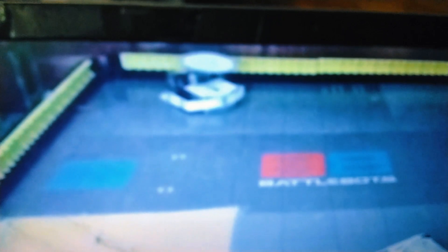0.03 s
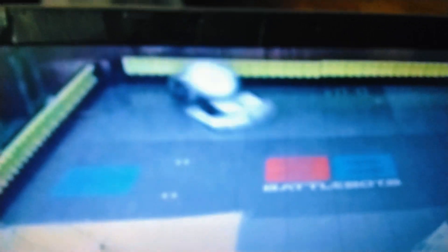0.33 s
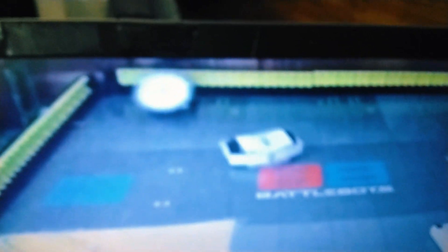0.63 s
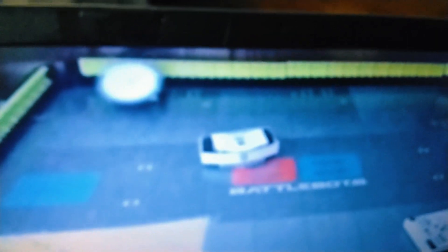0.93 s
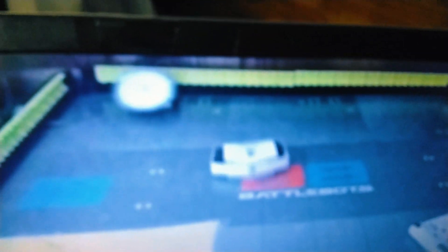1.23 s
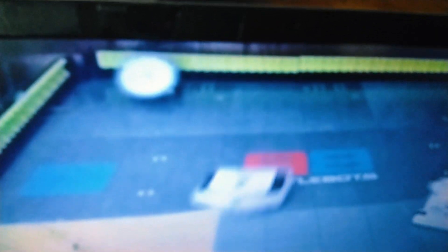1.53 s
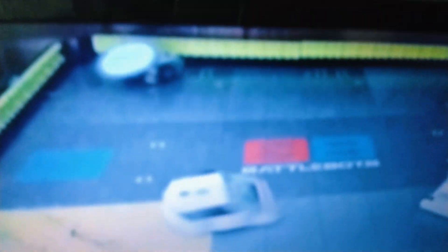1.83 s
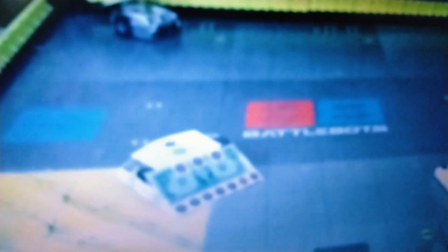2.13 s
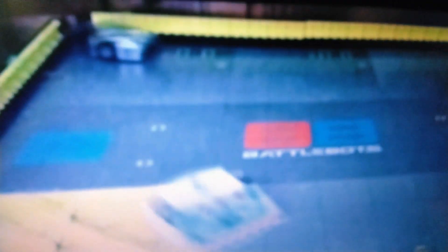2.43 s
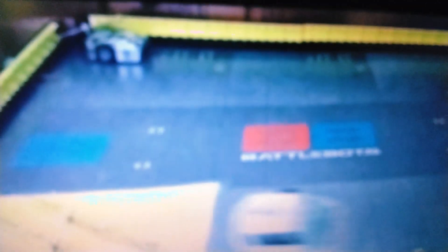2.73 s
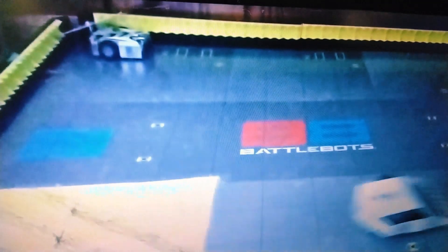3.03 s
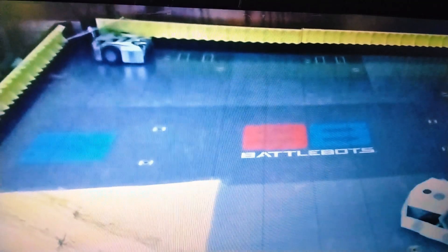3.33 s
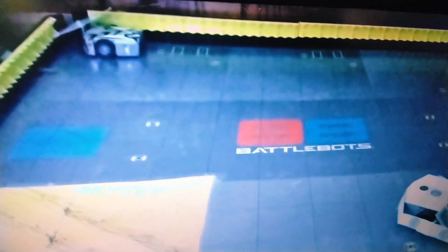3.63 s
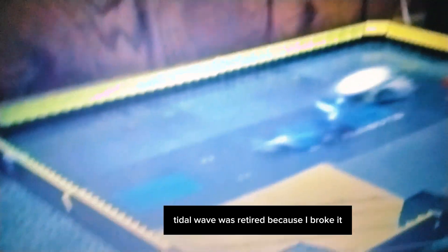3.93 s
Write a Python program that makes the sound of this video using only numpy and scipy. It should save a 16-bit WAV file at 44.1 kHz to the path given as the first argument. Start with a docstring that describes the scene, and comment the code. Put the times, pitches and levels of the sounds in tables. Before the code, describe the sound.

Toy robots drive in short spurts with rattling plastic gears and a few knocks.

```python
"""Toy robots in a tabletop arena

Two toy robots drive in bursts round a plastic arena: gear teeth chatter through their shells and
wheels roll on the board. Gears snap as a motor starts or stops and whine once, a tyre scrapes, and
the robots knock into things. All this is on the left, with a few dull bumps on the hand-held camera;
the right carries little but the camera's low rumble, its ticks and one thump."""
import sys
import numpy as np
from scipy import signal
from scipy.fft import rfft, irfft, next_fast_len
from scipy.io import wavfile
from scipy.ndimage import uniform_filter1d, map_coordinates

SR = 44100
rng = np.random.default_rng(int(sys.argv[2]) if len(sys.argv) > 2 else 0)


def wrap_up_sound(samples):
    """Save the sound to the file named by the first command line argument, as 16-bit audio."""
    columns = np.atleast_2d(samples).T
    # keep every value between -1 and 1, then stretch to whole-number steps
    tamed = np.clip(columns, -1, 1)
    steps = np.round(tamed * 32767).astype(np.int16)
    wavfile.write(sys.argv[1], SR, steps)


N = 176400

# Shell and board resonances, voiced for each robot position (frequency [Hz], width [Hz],
# at the back wall [dB], crossing the middle [dB], turning [dB], close by [dB])
SHELL_MODES = [(905, 80, -9, -3, -6, -8.5), (1290, 115, -7, -5, -10, -9), (1540, 110, -13, -7, -9, -24),
               (2210, 200, -1, -8.5, -9.5, -6), (2760, 200, -12, -12, -11, -14),
               (3260, 220, -1, -11, -12, -15), (3930, 330, -10, -12, -13, -11),
               (5110, 290, -7, -10, -6, -8), (5560, 170, -17, -12, -12, -12), (6050, 130, -2, -8, -10, -8),
               (6430, 230, -2, -8, -9, -9), (7070, 150, 0, 0, 0, -.5), (7440, 240, -16, -10, -7, -5),
               (8700, 150, -12, -11, -17, -12), (9250, 210, -26, -14, -17, -11),
               (10000, 260, -22, -15, -22, -12), (10850, 250, -35, -10, -18, -9),
               (11530, 230, -21, -8, -11, -6), (11890, 90, -8, -5, -6, 1.5), (12590, 140, -26, -6, -10, -2),
               (13270, 200, -27, -7, -13, -6)]
# Envelope and tone of each run (time [s], gear level [dB], wheel roll gain [dB], treble gain [dB])
FAR_RUN = [(0, -40, 8, 2), (.13, -38, 0, -1), (.26, -36, -1, 0), (.32, -39, -4, 1), (.38, -53, -3, 0)]
FIRST_RUN = [(0.53, -45.5, -1.5, 1), (0.57, -33.5, -6.5, -0.5), (0.65, -26.5, -3, -3.5), (0.8, -31.5, 0, 2),
             (0.93, -29, -3, 2.5), (1.03, -33.5, -0.5, -1.5), (1.09, -42, -5, -10.5), (1.14, -57, -1, -17)]
SECOND_RUN = [(1.535, -44.5, -15, 5), (1.59, -31.5, -7.5, -2.5), (1.7, -30, -2, 1), (1.86, -29.5, -4.5, 0),
              (1.97, -31.5, 0, 2), (2.03, -44.5, 1, 0)]
SLOW_TURN = [(2.02, -42, -14, 6), (2.09, -38.5, -3, -3), (2.22, -34.5, 2.5, 0), (2.34, -33, 3, 4),
             (2.42, -34.5, 8, 5), (2.485, -43, 10, 6), (2.54, -51.5, 8, 1)]
LAST_RUN = [(2.585, -30.5, -1, -5), (2.66, -25.5, 1.5, -4.5), (2.86, -25.5, 4.5, -5.5), (2.98, -28, 8, 1.5),
            (3.05, -29, 4.5, -5.5), (3.11, -24, -1, -1.5), (3.35, -25, -1.5, -1.5), (3.6, -28, -5.5, 2.5),
            (3.73, -25.5, 1, -2), (3.98, -24.5, 1.5, -2.5)]


def robot_runs():
    """Five bursts of driving, each coloured by where the robot is in the arena."""
    hz, width, *levels = np.transpose(SHELL_MODES)
    far, middle, turning, near = (list(zip(hz, width, db)) for db in levels)
    return (drive(FAR_RUN, far) + drive(FIRST_RUN, middle) + drive(SECOND_RUN, middle)
            + drive(SLOW_TURN, turning) + drive(LAST_RUN, near))


def drive(run, modes, teeth_per_s=7000, spread_db=.5, judder_db=.8, rise_db_s=900, fall_db_s=500):
    """Dense, irregular tooth impacts ring the shell; the low band stands for the rolling wheels."""
    t = clock()
    times, gear_db, roll_db, treble_db = np.transpose(run)
    teeth = (rng.random(N) < teeth_per_s / SR) * rng.choice([-1, 1], N)
    teeth = teeth * amp(spread_db * rng.standard_normal(N))
    bands = shell_bands(flutter(teeth), modes)
    fade_db = rise_db_s * np.maximum(times[0] - t, 0) + fall_db_s * np.maximum(t - times[-1], 0)
    level_db = np.interp(t, times, gear_db) - fade_db + judder_db * wobble(knots_per_s=80)
    tilts_db = np.interp(t, times, roll_db), 0, np.interp(t, times, treble_db)
    return sum(band * amp(level_db + tilt) for band, tilt in zip(bands, tilts_db))


def flutter(x, width_hz=1000, length_s=.03, depth_db=1.7, frame=256):
    """Loose parts rattle on their own: patches of the spectrum briefly swell and sink."""
    spectrum = signal.stft(x, nperseg=frame)[2]
    swell = uniform_filter1d(rng.standard_normal(spectrum.shape), round(width_hz * frame / SR), axis=0)
    swell = uniform_filter1d(swell, round(length_s * SR / frame), axis=1)
    return signal.istft(spectrum * amp(depth_db * unit(swell)), nperseg=frame)[1][:N]


# Ring of plastic hit from outside (frequency [Hz], width [Hz], level [dB])
KNOCK_MODES = [(950, 100, 0), (1330, 170, -5), (2200, 280, 0), (3800, 600, -7), (5400, 400, 0),
               (6300, 280, -5), (7200, 340, 1), (9700, 1400, -9), (11800, 400, -2), (12750, 550, -4)]
# Collisions (time [s], level [dB], body gain [dB], treble gain [dB])
KNOCKS = [(.731, -31, 13, 0), (2.3685, -22.5, 4, 0), (2.9005, -15, -1, -3), (2.9425, -18.5, 0, 4)]


def knocks(hold_s=.004, t60_s=.055):
    """A robot hits something and its loose plastic parts rattle briefly."""
    body, crack, treble = shell_bands(rng.standard_normal(N), KNOCK_MODES)
    return sum(amp(db) * burst(s, hold_s, t60_s) * (amp(body_db) * body + crack + amp(treble_db) * treble)
               for s, db, body_db, treble_db in KNOCKS)


# Bright ring of a gear snap (frequency [Hz], width [Hz], level [dB])
SNAP_MODES = [(4640, 3800, -16.5), (7240, 580, 0.5), (11660, 1160, -3)]
# Snap cues (time [s], level [dB], treble gain [dB], 60 dB decay [s])
SNAPS = [(.414, -47, 3, .06), (.521, -42, 0, .1), (.620, -27, -2, .05), (1.408, -45, 2, .22),
         (1.523, -45, 4, .1), (2.461, -26, -6, .018), (2.556, -27, -3, .1)]


def gear_snaps(hold_s=.002):
    """The gears snap with a short rattle as a motor starts or stops."""
    body, crack, treble = shell_bands(rng.standard_normal(N), SNAP_MODES)
    return sum(amp(db) * burst(s, hold_s, t60) * (body + crack + amp(treble_db) * treble)
               for s, db, treble_db, t60 in SNAPS)


# Gear whine, then tyre scrape (start [s], end [s], from [Hz], to [Hz], width [Hz], level [dB])
WHINE_AND_SCRAPE = [(1.73, 1.95, 1395, 1305, 28, -39.5), (2.63, 2.78, 5650, 5300, 450, -33)]


def whine_and_scrape(fade_s=.17):
    """A rough gear whine, then a short hissing tyre scrape: noise bands that sag in pitch."""
    t, out = clock(), np.zeros(N)
    for start, end, first_hz, last_hz, width, db in WHINE_AND_SCRAPE:
        phase = 2 * np.pi * np.cumsum(np.interp(t, [start, end], [first_hz, last_hz])) / SR
        lowpass = 1 / (1 + (freqs() / width) ** 2)
        rough_cos, rough_sin = (filtered(row, lowpass) for row in rng.standard_normal((2, N)))
        fade = np.clip(np.minimum(t - start, end - t) / fade_s + .5, 0, 1)
        out += amp(db) * fade * unit(rough_cos * np.cos(phase) + rough_sin * np.sin(phase))
    return out


# Notches where the shell's modes cancel (frequency [Hz], width [Hz])
SHELL_HOLLOWS = [(1630, 30), (4420, 43), (5850, 27), (8250, 57)]


def shell_response(modes, low_hz=580, treble_cut_hz=14400, hollow_db=-5.5):
    """Plastic shell resonances with little bass, followed by a steep treble cut."""
    f = freqs()
    power = sum(amp(db) ** 2 / (1 + ((f - hz) / width) ** 2) ** 2 for hz, width, db in modes)
    power = power / (1 + (low_hz / (f + 1)) ** 8) / (1 + (f / treble_cut_hz) ** 160)
    for hz, width in SHELL_HOLLOWS:
        power *= amp(hollow_db * np.exp(-((f - hz) / width) ** 2)) ** 2
    # Minimum phase, so the ring follows the hit
    cepstrum = irfft(np.log(power + 1e-12) / 2)
    cepstrum[1:len(f) - 1] *= 2
    cepstrum[len(f):] = 0
    return np.exp(rfft(cepstrum))


def shell_bands(excitation, modes, body_hz=1720, treble_hz=8000):
    """The shell ringing in the arena, split into body, middle and treble."""
    ring = unit(wall_echoes(filtered(excitation, shell_response(modes))))
    below_middle, below_treble = (1 / (1 + (freqs() / hz) ** 16) for hz in (body_hz, treble_hz))
    return [filtered(ring, gain) for gain in (below_middle, below_treble - below_middle, 1 - below_treble)]


def wall_echoes(x, gap_s=.003, decay_s=.016, wet_db=-8, shift_s=1.0):
    """The low walls add a short spray of echoes; patterns crossfade as the robots move."""
    t = np.arange(SR // 20) / SR
    wet = np.zeros(N)
    for centre in np.arange(0, N / SR + shift_s, shift_s):
        echoes = rng.standard_normal(len(t)) * np.exp(-t / decay_s) * (t > gap_s)
        crossfade = np.sqrt(np.maximum(1 - np.abs(clock() - centre) / shift_s, 0))
        wet += signal.oaconvolve(x * crossfade, echoes / np.linalg.norm(echoes))[:N]
    return x + amp(wet_db) * wet


# Bump cues (time [s], level [dB], 60 dB decay [s])
BUMPS = [(.002, -24, 0.087), (0.027, -35.5, 0.8), (.811, -20, 0.017), (0.819, -37.5, 0.34)]
# Muffled tone of a bump (frequency [Hz], level [dB])
BUMP_COLOUR = [(30, -15), (70, -1), (170, -1.5), (450, -6), (750, -8), (1300, -28), (4000, -40)]


def camera_bumps():
    """Soft bumps on the camera's left side die away as dull noise."""
    return noise(BUMP_COLOUR) * sum(amp(db) * burst(s, 0, t60) for s, db, t60 in BUMPS)


# Swells of the camera body's boom (time [s], level [dB])
BOOM_SWELLS = [(0.34,-48.5), (0.46,-44.5), (0.73,-50.5), (0.8,-36.5), (0.91,-34.5), (0.98,-46), (1.2,-47.5),
               (1.3,-36), (1.41,-38.5), (1.68,-49), (1.82,-39), (2.0,-40.5), (2.15,-51), (2.28,-42),
               (2.45,-56), (2.58,-54), (2.65,-66), (3.02,-61), (3.14,-46), (3.3,-68), (3.52,-48.5),
               (3.68,-44), (3.8,-72), (3.97,-43.5)]
# Broad rumble around the boom (frequency [Hz], level [dB])
BOOM_SKIRT = [(15, -2), (60, -6), (130, -8), (200, -13), (350, -22.5), (800, -37.5), (2000, -42.5),
              (6000, -71)]


def handling_rumble(boom_hz=95.4, width_hz=20.5, steadiness=.48, skirt_db=-1.5):
    """The hand's movements make the camera body boom at one low resonance."""
    resonance = 1 / (1 + ((freqs() - boom_hz) / width_hz * 2) ** 4)
    ring = signal.hilbert(filtered(rng.standard_normal(N), resonance))
    boom = unit(ring.real / (np.abs(ring) + 1e-9) ** steadiness)  # partly evens out the beating
    swell = amp(np.interp(clock(), *np.transpose(BOOM_SWELLS)))
    return swell * (boom + amp(skirt_db) * noise(BOOM_SKIRT))


# Tick cues (time [s], peak [dB])
TICKS = [(0.796, -23.5), (0.925, -29)]


def case_ticks(decay_s=.0022):
    """The camera's case ticks: a sharp step that dies at once."""
    t = clock()
    return sum(amp(db) * (t >= s) * np.exp(-np.abs(t - s) / decay_s) for s, db in TICKS)


def camera_thump(time_s=1.926, peak_db=-22, width_s=.003):
    """One hard push on the camera body gives a rounded pressure pulse."""
    offset = (clock() - time_s) / width_s
    return -amp(peak_db) * (1 - 2 * offset ** 2) * np.exp(-offset ** 2)


# Tone of the noise bed on each side (frequency [Hz], level [dB])
LEFT_BED = [(25, -16), (60, 7), (170, -0.5), (600, -14.5), (1500, -20.5), (4000, -28), (12000, -26)]
RIGHT_BED = [(12, 9.5), (25, -6), (60, -9), (110, 1), (170, -32), (300, -25.5), (4000, -34)]


def background(left_db=-48.5, right_db=-49):
    """A steady bed of low rumble and faint hiss, separate on each side."""
    return np.array([amp(left_db) * noise(LEFT_BED), amp(right_db) * noise(RIGHT_BED)])


def amp(db):
    """Decibels to amplitude."""
    return 10 ** (np.asarray(db) / 20)


def unit(x):
    """Scale to an rms of 1."""
    return x / np.sqrt(np.mean(x ** 2) + 1e-20)


def clock():
    """Sample times in seconds."""
    return np.arange(N) / SR


def freqs():
    """The frequencies in Hz on which filters are drawn."""
    return np.fft.rfftfreq(2 * next_fast_len(N // 2 + 8192), 1 / SR)


def filtered(x, gain):
    """Apply a response drawn on freqs()."""
    size = 2 * len(gain) - 2
    return irfft(rfft(x, size) * gain, size)[:N]


def wobble(knots_per_s):
    """A smooth random curve."""
    knots = rng.standard_normal(int(N * knots_per_s / SR) + 4)
    return map_coordinates(knots, [clock() * knots_per_s])


def noise(colour):
    """Noise of rms 1, shaped by points of (frequency [Hz], level [dB])."""
    hz, db = np.transpose(colour)
    gain = amp(np.interp(np.log(freqs() + 1), np.log(hz), db))
    return unit(filtered(rng.standard_normal(N), gain))


def burst(start, hold, t60):
    """Sudden attack, hold, exponential release."""
    t = clock() - start
    return (t >= 0) * amp(-60 * np.clip((t - hold) / t60, 0, 2))


def scene():
    """Robots and bumps on the left, handling noise on the right, over the noise bed."""
    left = knocks() + gear_snaps() + robot_runs() + whine_and_scrape() + camera_bumps()
    right = handling_rumble() + case_ticks() + camera_thump()
    return np.array([left, right]) + background()


def record(dry, top_hz=15800):
    """The camera keeps nothing above its band limit."""
    return np.array([filtered(channel, freqs() < top_hz) for channel in dry])


dry = scene()
out = record(dry)
wrap_up_sound(out)
```